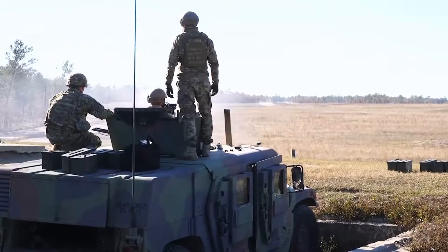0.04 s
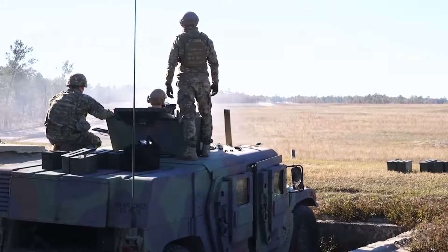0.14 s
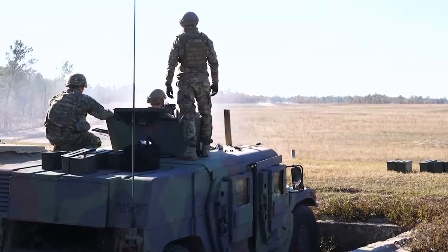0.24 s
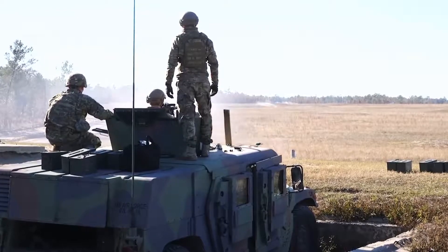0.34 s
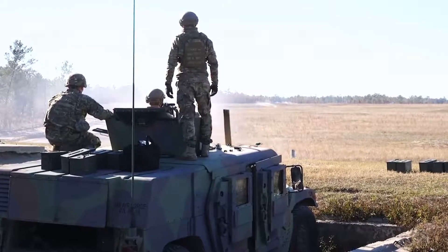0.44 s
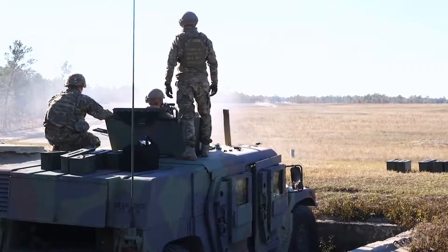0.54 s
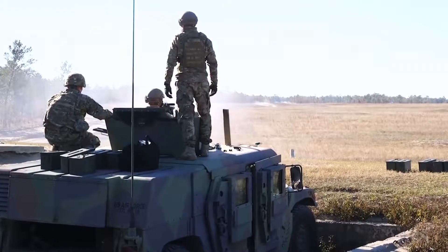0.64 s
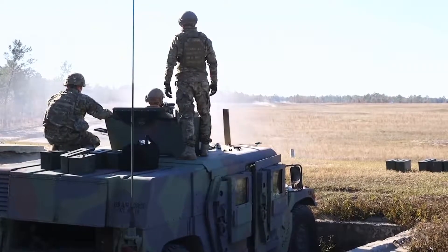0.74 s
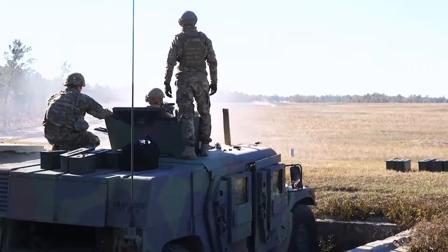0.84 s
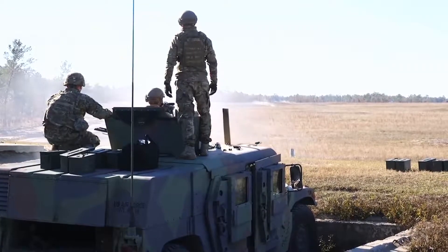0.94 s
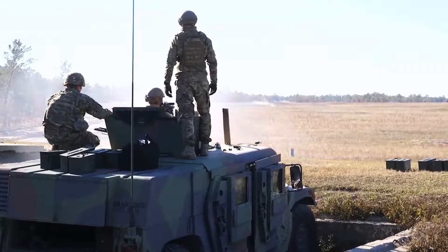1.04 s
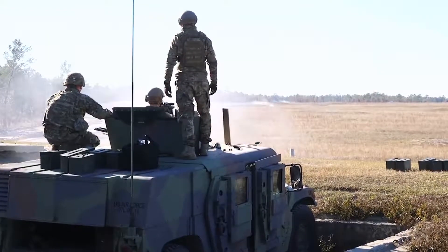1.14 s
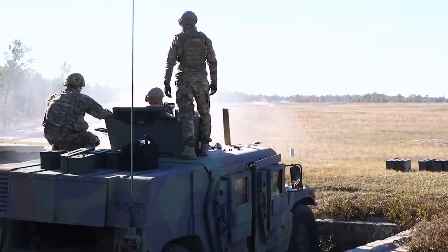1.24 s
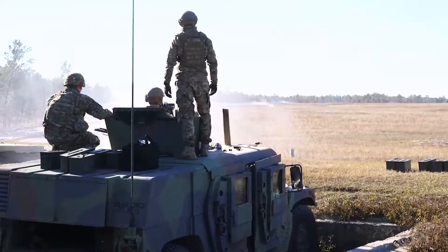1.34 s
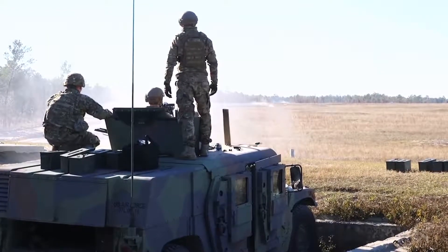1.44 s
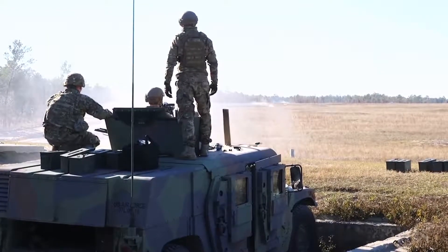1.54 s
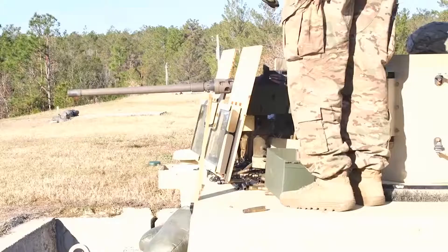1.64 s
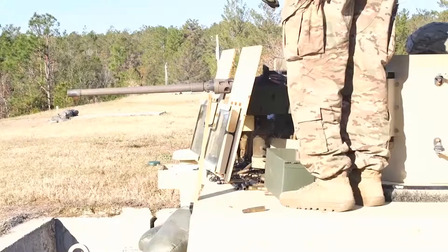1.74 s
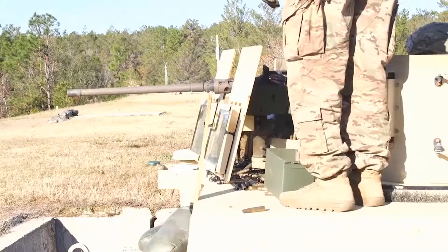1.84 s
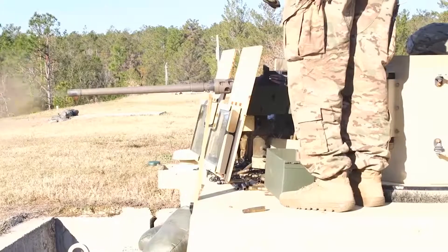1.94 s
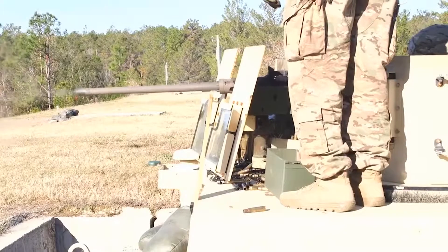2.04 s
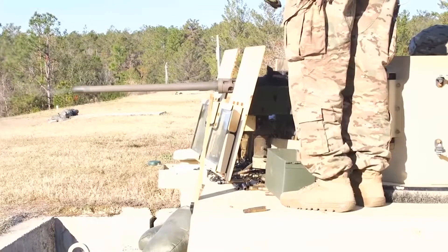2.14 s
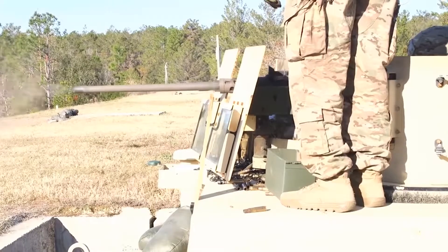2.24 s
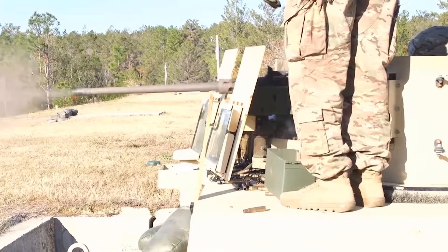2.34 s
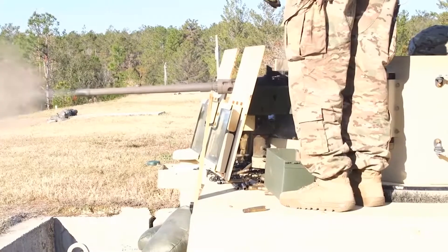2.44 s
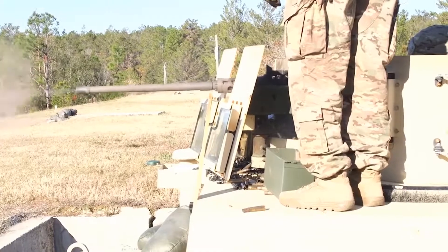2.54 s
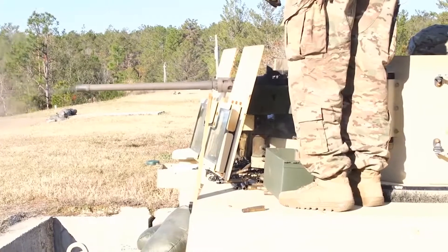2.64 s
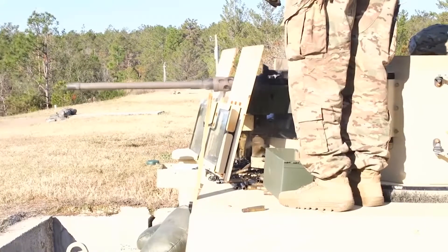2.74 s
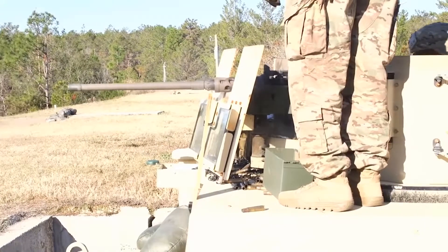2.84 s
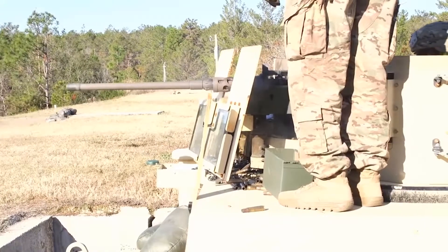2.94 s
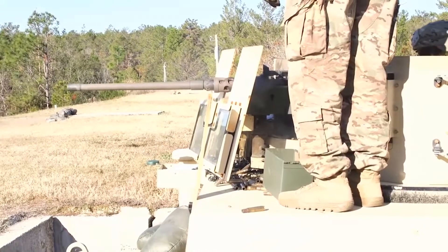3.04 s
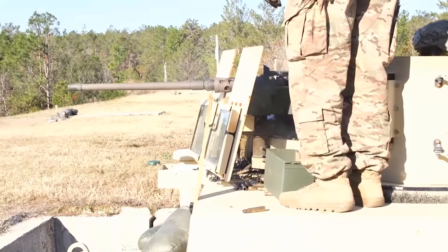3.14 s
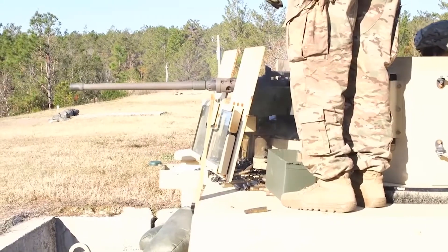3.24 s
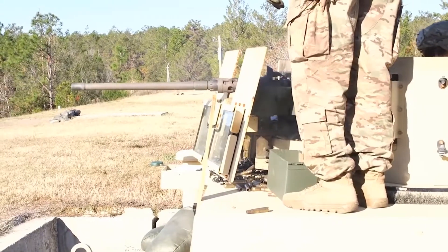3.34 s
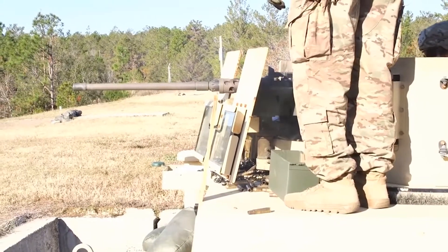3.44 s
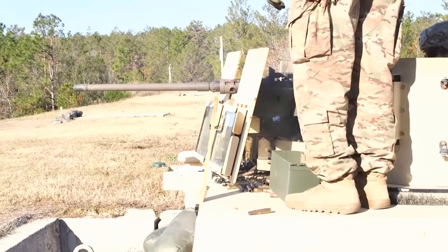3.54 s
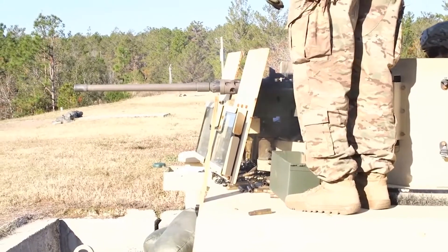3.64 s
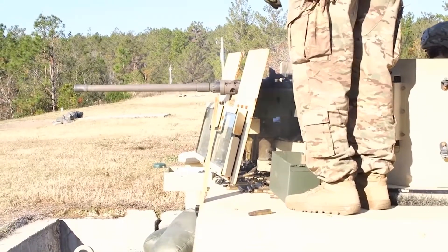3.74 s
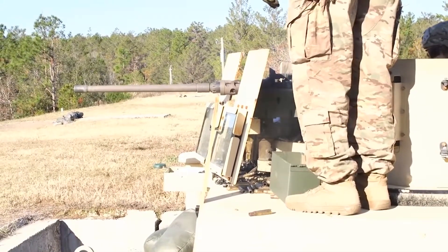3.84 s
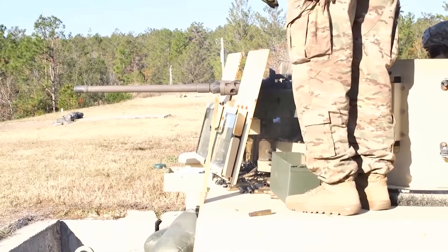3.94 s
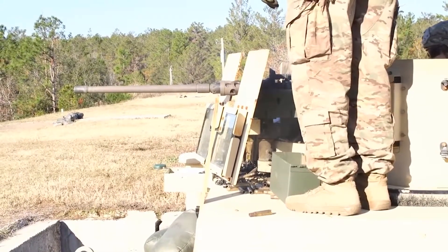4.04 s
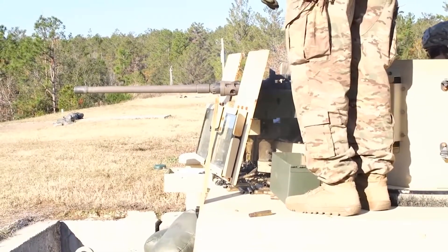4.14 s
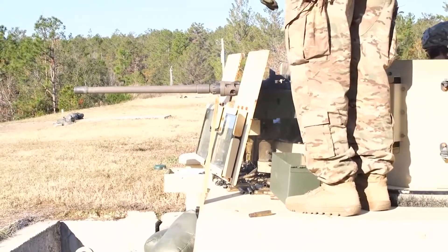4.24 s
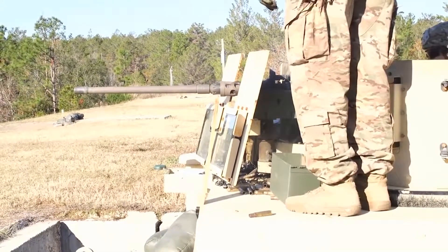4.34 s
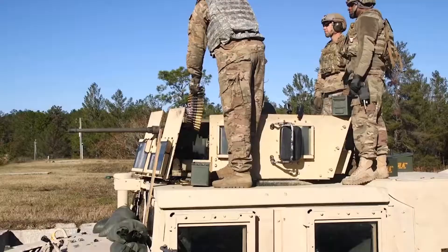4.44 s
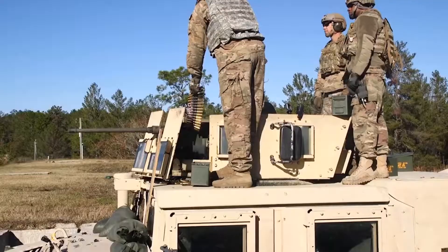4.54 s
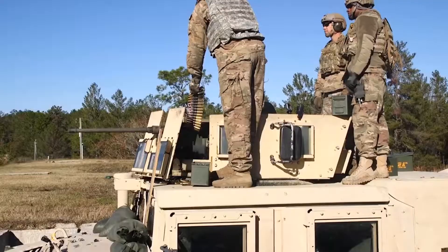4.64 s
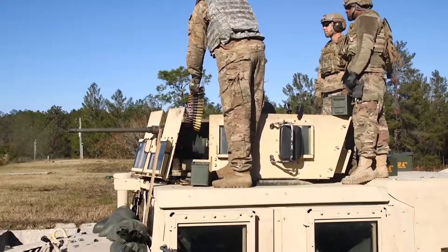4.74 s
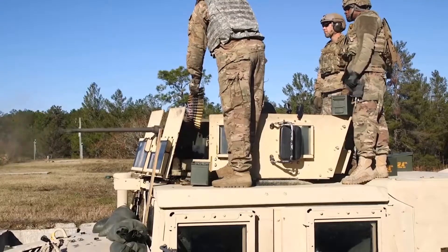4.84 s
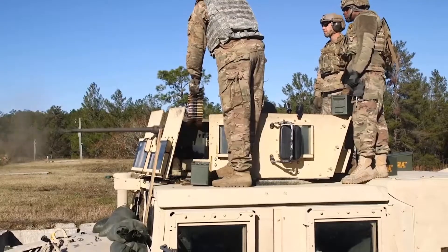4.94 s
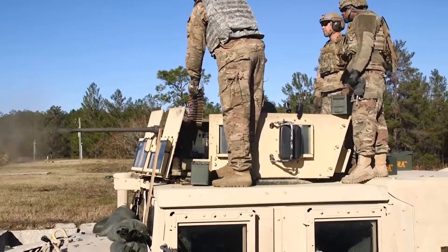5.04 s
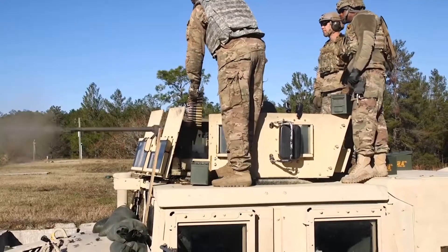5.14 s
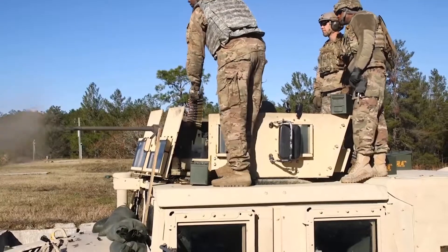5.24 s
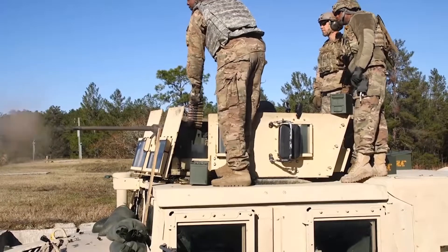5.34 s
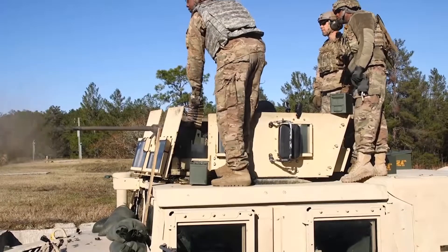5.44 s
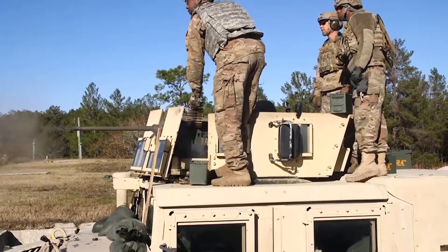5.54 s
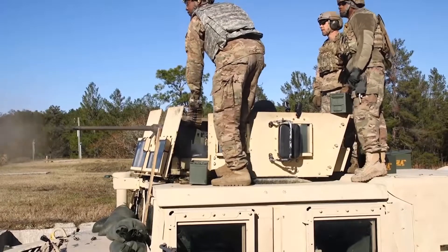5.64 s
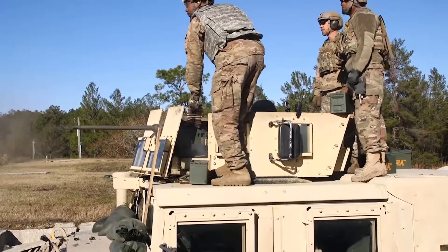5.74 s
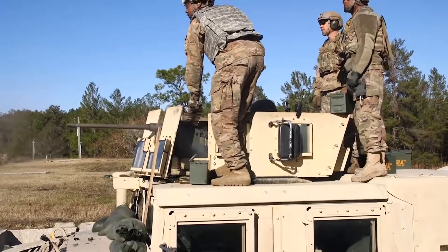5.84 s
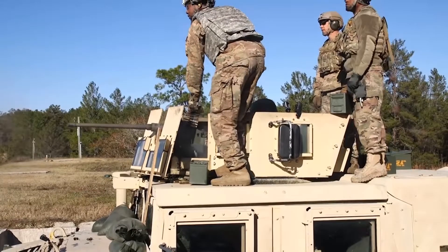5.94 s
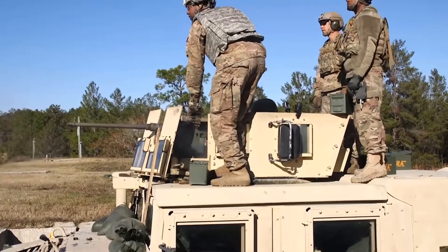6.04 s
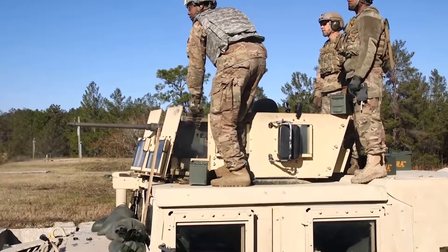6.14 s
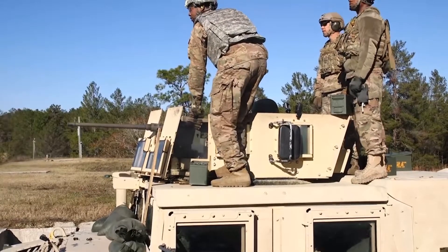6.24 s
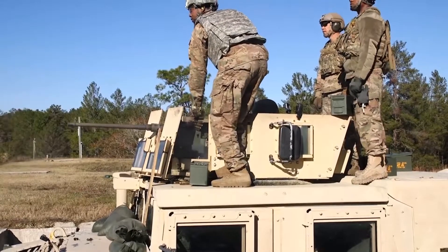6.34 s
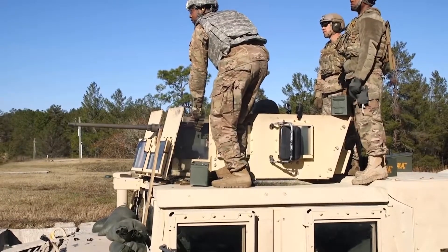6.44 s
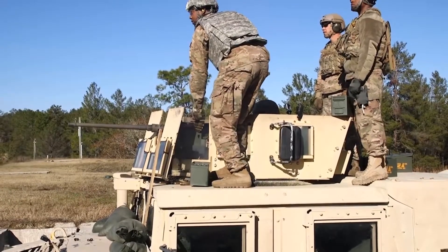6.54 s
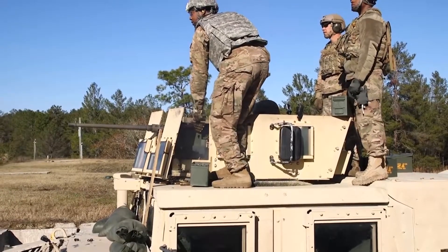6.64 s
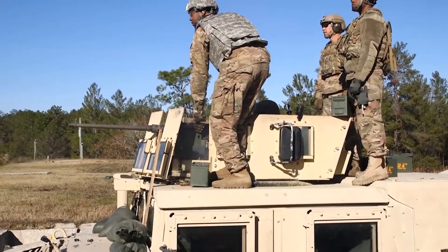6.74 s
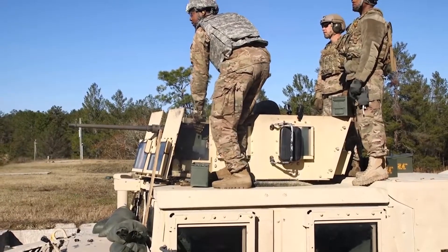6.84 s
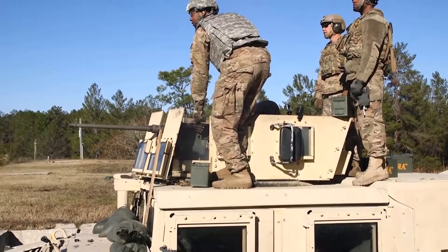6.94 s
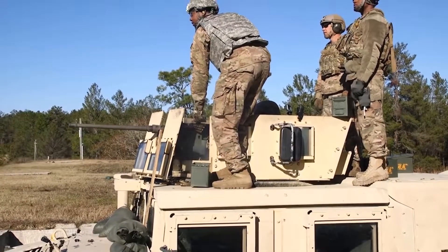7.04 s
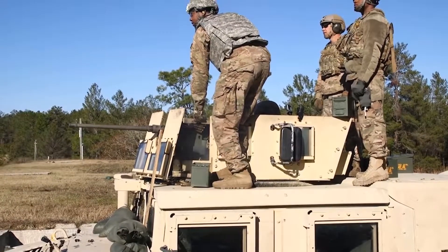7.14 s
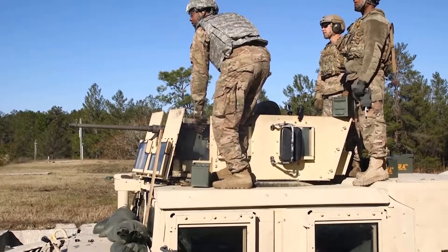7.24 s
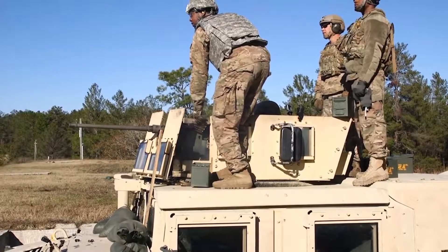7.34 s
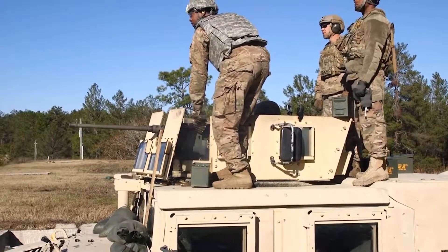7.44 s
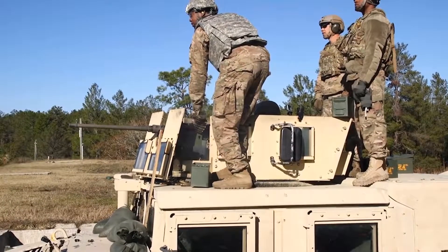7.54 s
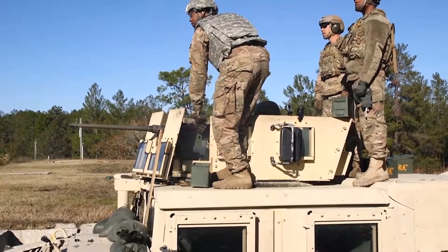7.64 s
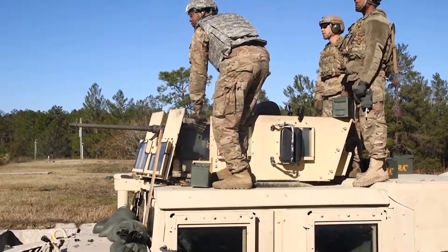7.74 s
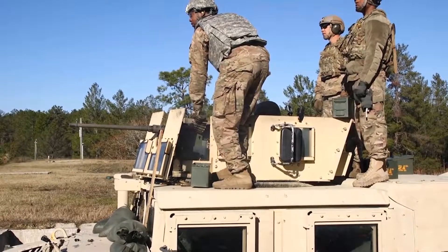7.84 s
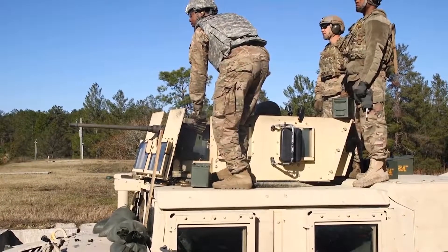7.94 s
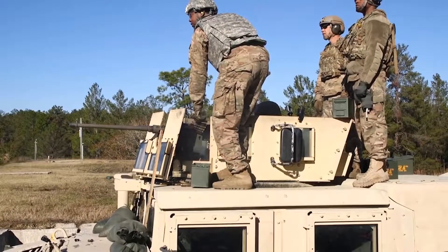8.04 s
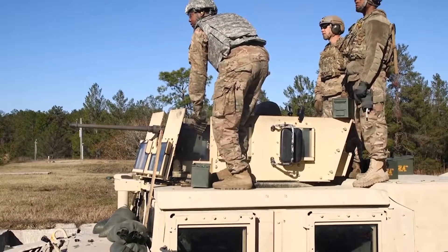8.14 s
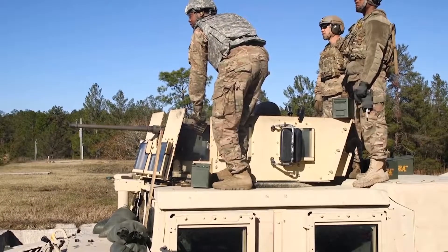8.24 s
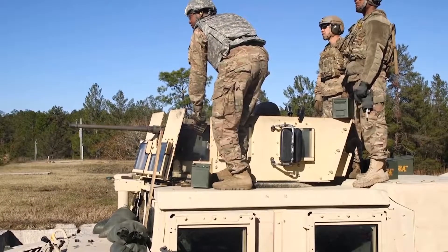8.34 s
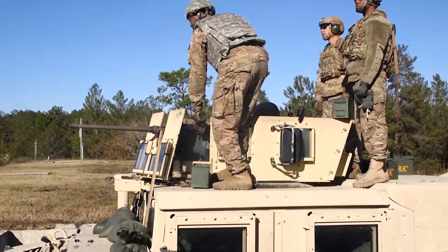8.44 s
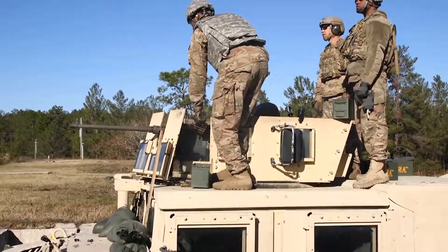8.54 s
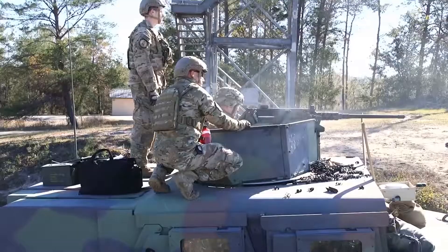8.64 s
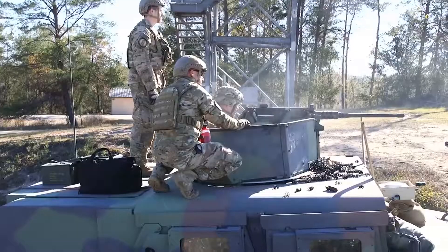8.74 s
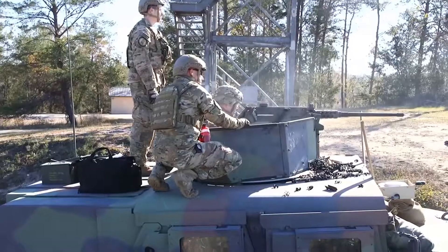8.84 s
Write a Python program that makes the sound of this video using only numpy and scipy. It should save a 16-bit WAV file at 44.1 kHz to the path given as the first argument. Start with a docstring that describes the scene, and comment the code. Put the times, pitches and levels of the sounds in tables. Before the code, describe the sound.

On an open range, a heavy machine gun fires a rapid burst from some distance to the left. Two close, faster bursts follow, booming and overloading the microphone, their echoes rolling away over the field. After each, the steel ammunition belt jingles and spent cases clink on a vehicle roof. A last, duller burst with sharp snaps comes from a neighbouring gun. The microphone changes position for each burst.

```python
"""Heavy machine guns on an open range

Four bursts, with the microphone at a new place around the armoured vehicles for each. Every round
sends nearly the same blast and low boom, which overload the microphone into flat tops, and echoes
roll away over the field. The steel ammunition belt jingles and spent cases clink on the roof."""
import sys
import numpy as np
from scipy import signal
from scipy.fft import rfft, irfft, next_fast_len
from scipy.io import wavfile

SR = 44100
rng = np.random.default_rng(int(sys.argv[2]) if len(sys.argv) > 2 else 0)


def generate_wav(sig):
    """Save sig (samples, or channels by samples) to the path in sys.argv[1] as 16-bit PCM at SR."""
    pcm = np.round(np.clip(np.atleast_2d(sig).T, -1, 1) * 32767).astype(np.int16)
    wavfile.write(sys.argv[1], SR, pcm)


N = 391608
TIME = np.arange(N) / SR


def from_db(db):
    """Decibels to gain."""
    return 10 ** (np.asarray(db) / 20)


def gain_at(points, hz):
    """Gain of a (Hz, dB) table, joined on a log-frequency axis."""
    table = np.array(points)
    return from_db(np.interp(np.log(hz + 1), np.log(table[:, 0]), table[:, 1]))


def pan(left_db):
    """Channel gains: the left leads by left_db, as the right is turned down."""
    return from_db([[0], [-left_db]])


def dying(t60, rise_s=0.00045):
    """A quick swell, then an exponential decay down to -60 dB."""
    t = np.arange(int(t60 * SR)) / SR
    return from_db(-60 * t / t60) * (1 - np.exp(-t / rise_s))


def ragged(samples, spread_db, count):
    """An uneven gain with mean power near 1: energy arrives in random clumps."""
    clumps = from_db(spread_db * np.clip(rng.normal(size=count), -2, 2))
    clumps /= np.sqrt(np.mean(clumps ** 2))
    return np.interp(np.arange(samples), np.linspace(0, samples, count), clumps)


def add(out, s, sound):
    """Mix a sound in at time s."""
    at = round(s * SR)
    first, last = max(at, 0), min(at + sound.shape[-1], N)
    if last > first:
        out[:, first:last] += sound[..., first - at:last - at]


def one_pole(x, hz, kind="low"):
    """A gentle low-pass or high-pass."""
    return signal.sosfilt(signal.butter(1, hz, kind, fs=SR, output="sos"), x)


def noise(colour, likeness, corner_hz=20000, size=65536, air_hz=40000):
    """A loop of coloured stereo noise, dulled by the air; the channels grow unrelated in the treble."""
    hz = np.fft.rfftfreq(size, 1 / SR)
    shape = gain_at(colour, hz) / np.hypot(1, hz / corner_hz) * np.exp(-(hz / air_hz) ** 2)
    alike = np.clip(likeness, -.98, .98) / (1 + (hz / 2600) ** 2)
    left, other = np.exp(2j * np.pi * rng.random((2, len(hz))))
    right = alike * left + np.sqrt(1 - alike ** 2) * other
    x = irfft(shape * np.array([left, right]))
    return x / x.std()


def excerpt(loop, count, start=0):
    """Samples of a loop, from a given share of the way round."""
    return np.take(loop, np.arange(count) + int(start * loop.shape[1]), axis=1, mode="wrap")


def times_of(rounds):
    """The moments at which the rounds go off."""
    return [s for s, _ in rounds]


def arrival(delay, t60, blur, rise_s=0.0022, crack_db=-5, crack_s=0.003):
    """Envelope of one path: a short crack on top of a dying roar; longer paths blur the front."""
    fade = dying(t60, rise_s + blur * abs(delay))
    return fade * (1 + from_db(crack_db) * np.exp(-TIME[:len(fade)] / crack_s))


def blasts(rounds, paths, colour, likeness, repeat, blur=0.0063, steady_hz=2200, uneven_db=2.5):
    """Each blast arrives direct and off the terrain; below the treble a share (repeat) recurs."""
    out = np.zeros((2, N))
    for delay, level_db, t60, bass_hz, treble_hz, left_db in paths:
        air_hz = 5200 / np.sqrt(abs(delay) + t60 / 8)   # the longer the way, the more treble is absorbed
        loop = one_pole(noise(colour, likeness, treble_hz, air_hz=air_hz), bass_hz, "high")
        fade = from_db(level_db) * pan(left_db) * arrival(delay, t60, blur)
        length = fade.shape[1]
        fade *= ragged(length, 4.5 * min(t60, 1), count=2 + int(t60 * 60))   # long echoes come in slaps
        steady = one_pole(loop, steady_hz)
        pattern = np.sqrt(repeat) * excerpt(steady, length)
        loose = loop - (1 - np.sqrt(1 - repeat)) * steady
        for s, crack_db in rounds:
            strength = from_db(crack_db if delay == 0 else uneven_db * rng.normal())
            roar = pattern + excerpt(loose, length, rng.random())
            add(out, s + delay, strength * fade * ragged(length, spread_db=1, count=60) * roar)
    return out


def booms(rounds, tones, polarity, lag_s=0, spread_db=1, detune=.008):
    """Low booms and pitched echo slaps after each blast; the right channel can lag and be inverted."""
    out = np.zeros((2, N))
    for delay, hz, level_db, t60, left_db in tones:
        fade = dying(t60, rise_s=0.0019) * pan(left_db) * [[1], [polarity]]
        t = TIME[:fade.shape[1]] - [[0], [lag_s]]
        for s in times_of(rounds):
            louder, higher = rng.normal(size=2)
            swing = np.sin(2 * np.pi * hz * (1 + detune * higher) * t)
            add(out, s + delay, from_db(level_db + spread_db * louder) * fade * swing)
    return out


# Spectrum of a snap. Each row: multiple of its centre frequency, density in dB.
SNAP_BAND = [(.08, -20), (.5, 1), (1, 3), (2, -10), (6, -30)]

def snaps(rounds, table, uneven_db=1.0):
    """Sharp snaps of the shot and bright clicks of the bolt, uneven from round to round."""
    out = np.zeros((2, N))
    for delay, db, t60, hz, left_db in table:
        loop = noise([(hz * multiple, level) for multiple, level in SNAP_BAND], .3, size=16384)
        fade = dying(t60, rise_s=0.00013) * pan(left_db)
        for s, crack_db in rounds:
            strength = from_db(db + crack_db + uneven_db * rng.normal())
            add(out, s + delay, strength * fade * excerpt(loop, fade.shape[1], rng.random()))
    return out


def dull_knocks(times, knocks, left_db=4.0, rise_s=0.0026):
    """Soft bands of noise after each given time, as when a round comes back from bank and tree line."""
    out = np.zeros((2, N))
    for delay, db, t60, hz in knocks:
        band = [(hz / 5, -20), (hz / 1.3, -1), (hz, 0), (hz * 1.4, -4), (hz * 3, -20), (hz * 16, -54)]
        loop, fade = noise(band, -0.32, size=32768), dying(t60, rise_s)
        for s in times:
            add(out, s + delay, from_db(db) * fade * excerpt(loop, len(fade), rng.random()))
    return out * pan(left_db)


# The distant burst. Each row: start in seconds, crack level in dB.
FAR_ROUNDS = [(-.089, -1.5), (.0214, 0), (.1323, 0), (.242, 0.5), (.3529, -1), (.4614, 0.5), (.5685, 0),
              (.679, 2), (.7902, 1), (.9052, 0.5), (1.023, 0.5), (1.1396, -2), (1.2523, -1.5)]
# Ways to the microphone: direct, reflected, rolling echo. Each row: delay in seconds, level in dB,
# t60 in seconds, bass and treble corners in Hz, left lead in dB.
FAR_PATHS = [(0, 0.5, 0.13, 140, 3310, 29.5), (.022, -8, 0.085, 40, 7040, 21),
             (.058, -2, 0.14, 300, 2600, 27), (.078, 0.5, 0.082, 220, 2246, 27),
             (.14, -25, 0.13, 150, 2215, 20), (.19, -16.5, 0.35, 400, 2500, 23),
             (.254, -17, 0.09, 120, 2440, 26), (.1, -29.5, 1.8, 90, 2200, 23)]
# Spectrum of the report. Each row: frequency in Hz, density in dB.
FAR_COLOUR = [(25, -39), (70, -5), (130, -10.5), (190, -1), (300, -5.5), (480, -3.5), (800, -7),
              (1500, -13), (3000, -15), (6000, -17), (15000, -25.5)]
# Booms and slaps. Each row: delay in seconds, pitch in Hz, level in dB, t60 in seconds, left lead in dB.
FAR_BOOM = [(.009, 118, 1, 0.095, 27), (0, 409, 0, 0.051, 25), (0.018, 221, -3.5, 0.099, 20),
            (.033, 382, -1.5, 0.06, 24), (0.058, 451.5, 2.5, 0.1, 28), (.06, 603, -4, 0.12, 26.5),
            (.074, 331.6, -3, 0.15, 28)]
# Snaps of the shot and clicks of the bolt. Each row: delay in seconds, level in dB, t60 in seconds,
# centre in Hz, left lead in dB.
FAR_SNAPS = [(-.002, -20, .03, 8000, 15.5), (.0015, -6.5, 0.025, 6000, 22), (.021, 2, .008, 1407, 25),
             (0.028, -20.5, 0.033, 8940, 20), (.055, -20, 0.0064, 8000, 20.5),
             (.0605, -6, 0.009, 3950, 26.5), (0.077, -2, 0.0062, 2970, 28)]
# Returns from bank and tree line. Each row: delay in seconds, level in dB, t60 in seconds, centre in Hz.
FAR_ECHOES = [(.141, -16, 0.076, 290.4), (.19, -29.5, .08, 280), (.254, -13.5, .08, 290),
              (0.294, -27.5, .1, 280), (0.323, -24.5, 0.092, 270), (.389, -28.5, .06, 280),
              (0.418, -30.5, .16, 260)]

def far_gun():
    """From far behind, hard left: a gun feeds unevenly, early reflections as strong as its blast."""
    report = blasts(FAR_ROUNDS, FAR_PATHS, FAR_COLOUR, likeness=-0.4, repeat=.9, blur=0.0037)
    boom = booms(FAR_ROUNDS, FAR_BOOM, polarity=-1)
    echoes = dull_knocks(times_of(FAR_ROUNDS), FAR_ECHOES, left_db=23.0)
    return report + boom + snaps(FAR_ROUNDS, FAR_SNAPS) + echoes


# Microphone places. Each row: start in seconds, left and right overload ceilings in dB, rumble in dB.
PLACES = [(0, -13, -22.5, -78.5), (1.738, -18.5, -16.5, -80.5), (4.478, -17.5, -18, -53),
          (4.885, -19, -17.5, -59), (7.47, -21.5, -16, -72.5), (8.668, -18, -19, -78),
          (8.705, -18, -19, -70.5)]

def by_place():
    """Left ceiling, right ceiling and rumble as gains, held from one place to the next."""
    table = np.array(PLACES)
    row = np.searchsorted(table[:, 0], TIME, side="right") - 1
    return from_db(table[row, 1:]).T


# Background of the open range. Each row: frequency in Hz, density in dB.
RUMBLE = [(25, 6), (70, -11.5), (150, -4.5), (350, -6.5), (700, -7.5), (1400, -15.5), (3000, -27.5),
          (6000, -54), (15000, -74.5)]

def rumble():
    """A low noise whose level steps from place to place."""
    return by_place()[2] * pan(8) * excerpt(noise(RUMBLE, -0.59, size=131072), N)


def metal_ring(modes, detune, spread_db, tumble_hz=32, flutter=0.57):
    """One small piece rings: no two share a pitch or a striking spot, and each flutters as it tumbles."""
    t = TIME[:SR // 3]
    out = np.zeros((2, len(t)))
    for hz, db, t60 in modes:
        higher, louder, right, faster, facing = rng.normal(size=5)
        fade = from_db(db + spread_db * louder - 60 * t / t60)
        ring = fade * np.sin(2 * np.pi * hz * (1 + detune * higher) * t)
        turning = 1 + flutter * np.sin(2 * np.pi * (tumble_hz * 2 ** (faster / 2) * t + facing))
        out += np.outer([1, .7 * (right - 1)], ring * turning)
    return out


# Ring of a steel link. Each row: pitch in Hz, level in dB, t60 in seconds.
LINK_MODES = [(4820, -6.5, 0.39), (6320, -3.5, 0.24), (6470, -1.5, 0.22), (8740, -11, 0.18),
              (8840, -7, 0.17), (10500, -19.5, 0.18), (11450, -10, 0.18), (11900, -11, .18),
              (14100, -15.5, 0.16), (14850, -16, .16)]

def links(touches, count=20):
    """Each touch (s, dB) rings one of the belt's many links."""
    out = np.zeros((2, N))
    rings = [metal_ring(LINK_MODES, detune=.012, spread_db=6) for _ in range(count)]
    for s, db in touches:
        add(out, s, from_db(db) * rings[rng.integers(count)])
    return out * pan(12)


# The feed or a hand shakes the belt. Each row: start and length in seconds, level of a touch in dB.
BELT_SHAKES = [(1.297, 0.073, -65.5), (2.194, 0.57, -39.5), (3.513, 0.28, -54.5), (4.08, 0.017, -70),
               (4.3, .05, -64), (4.42, .04, -63), (5.0, 0.84, -45), (6.25, 0.95, -65.5)]

def shake_db(t, rise_db_per_s=598, settle_db_per_s=52):
    """Level of the belt's touches: each shake starts quickly, holds, then settles."""
    return np.max([db - rise_db_per_s * np.maximum(s - t, 0)
                   - settle_db_per_s * np.maximum(t - s - length, 0)
                   for s, length, db in BELT_SHAKES], axis=0)


# Links rubbing together. Each row: frequency in Hz, density in dB.
SCRAPE = [(500, -8.5), (2500, -7), (4300, -7.5), (4900, 3), (5500, -10), (6400, 5), (7600, -12.5),
          (8900, -0.5), (9800, -10.5), (11700, 1), (13000, -12.5), (15000, -7.5)]

def belt(rounds, touches_per_s=67, scrape_db=-5, ring_db=-16.5, bounce_s=0.02, bounce_loss_db=5):
    """Each round throws out a link; others land and bounce, or touch and scrape as the belt swings."""
    thrown = [(s + 0.032, -45) for s in times_of(rounds)]
    landed = [(s + swell_s / 2 + k * bounce_s, db + ring_db - k * bounce_loss_db)
              for s, db, swell_s, *_ in CLINKS for k in range(4)]
    times = np.arange(0, TIME[-1] - 1, 1 / touches_per_s)
    times += rng.random(len(times)) / touches_per_s
    swinging = list(zip(times, shake_db(times)))
    rubbing = ragged(N, spread_db=3, count=800) * excerpt(noise(SCRAPE, -0.074), N)
    scrape = from_db(shake_db(TIME) + scrape_db) * rubbing
    return links(thrown + landed + swinging) + scrape * pan(11.9)


# Spent cases land on the roof. Each row: start in seconds, level in dB.
CASE_DROPS = [(1.439, -48.5), (1.551, -55.5), (1.66, -54), (2.85, -37.5), (2.93, -48), (2.976, -43.5),
              (3.05, -42.5), (3.14, -58), (3.24, -49), (3.339, -69), (5.93, -45), (6.06, -56), (6.26, -53),
              (6.35, -59), (6.41, -54), (6.48, -58), (6.55, -57), (6.605, -57), (6.69, -71), (6.77, -59)]
# Ring of a brass case. Each row: pitch in Hz, level in dB, t60 in seconds.
CASE_MODES = [(5650, -10, .22), (6030, -9.5, 0.22), (6200, -12, 0.24), (7150, -7, 0.22), (8520, -8, 0.34),
              (10500, -9, 0.25), (10850, -12, .2), (11300, -12.5, 0.24), (12200, -17, 0.2),
              (12700, -19, 0.2), (14000, -19, .2), (14800, -13, .2)]
# Its rim grating on the roof. Each row: frequency in Hz, density in dB.
CASE_GRATE = [(500, -23), (3000, 1), (7000, 8), (9500, -11), (11500, -4), (15000, 4)]

def spent_cases(bounces=4, bounce_s=.045, bounce_loss_db=2.5, grate_db=-2):
    """Cases scatter in uneven, dying bounces, ringing and grating at every contact."""
    out, grating = np.zeros((2, N)), noise(CASE_GRATE, 0)
    tick = from_db(grate_db) * dying(t60=.05)
    for s, db in CASE_DROPS:
        ring = metal_ring(CASE_MODES, detune=0.0088, spread_db=4)
        gaps = bounce_s * (.5 + rng.random(bounces))
        for k in range(bounces):
            at, contact = s + gaps[:k].sum(), from_db(db - k * bounce_loss_db)
            add(out, at, contact * ring)
            add(out, at, contact * tick * excerpt(grating, len(tick), rng.random()))
    return out * pan(12.6)


# Knocks and far echoes. Each row: start in seconds, level in dB, t60 in seconds, centre in Hz.
KNOCKS = [(1.576, -39, 0.042, 1300), (1.687, -29.5, 0.083, 1500), (3.525, -51, 0.089, 1000),
          (3.585, -46, 0.14, 600), (3.745, -46, 0.1, 900), (3.826, -43.5, 0.2, 650), (3.92, -40, 0.18, 594),
          (4.087, -44, 0.12, 796), (4.194, -49, .06, 650), (4.282, -42.5, 0.072, 650),
          (4.345, -48, .06, 650), (4.425, -44, 0.061, 650), (6.262, -41.5, .2, 647),
          (6.519, -43, 0.11, 378), (6.704, -50, 0.11, 260), (7.166, -43, 0.091, 600)]

def late_knocks():
    """Dull knocks and far echoes of the last rounds, between bursts."""
    return dull_knocks([0], KNOCKS)


# The close gun from near by. Rows read as for the far gun.
NEAR_ROUNDS = [(2.0797, -0.5), (2.1936, 1), (2.288, -0.5), (2.3798, -1), (2.475, 0), (2.569, 0),
               (2.661, -1), (2.753, 1.5)]
NEAR_PATHS = [(0, -1.5, 0.19, 450, 8000, 9), (.014, -6, .13, 23, 2410, 4.4), (.034, -12, .17, 18, 450, 7.8),
              (0.095, -18.5, 0.069, 18, 900, 7.1), (.06, -31, 1.2, 20, 1200, 10),
              (.2, -48, 5.3, 20, 3600, 7.9)]
NEAR_COLOUR = [(25, -23), (60, -7.5), (150, -1), (330, -0.5), (550, -4), (1000, -6), (2000, -10),
               (4000, -12), (8000, -14), (15000, -22)]
NEAR_BOOM = [(0.018, 64, -6, 0.14, 24), (0.024, 240, -16, 0.24, 8.8), (0.033, 350, -11, 0.12, 11),
             (.02, 245, -15.5, 0.14, 2.7), (.032, 455, -11.5, 0.15, 17), (0.012, 42, -8, 0.088, 25),
             (0.0022, 27, -11, 0.067, 21)]
NEAR_ECHOES = [(.185, -17.5, 0.06, 602), (0.211, -24.5, 0.048, 573), (1.167, -44, .08, 523)]

def near_gun():
    """Close up: the first cycle is slow, the bolt is audible and a long echo rolls away."""
    report = blasts(NEAR_ROUNDS, NEAR_PATHS, NEAR_COLOUR, likeness=-0.63, repeat=0.65)
    boom = booms(NEAR_ROUNDS, NEAR_BOOM, polarity=-1, lag_s=0.00012)
    echoes = dull_knocks(times_of(NEAR_ROUNDS), NEAR_ECHOES)
    return report + boom + echoes + bolt(NEAR_ROUNDS, level_db=-27, lead_s=.022)


# Rattle of the bolt. Each row: frequency in Hz, density in dB.
BOLT = [(300, -19), (1500, -11), (3000, 3.5), (5500, -2.5), (9000, -6), (15000, -9)]

def bolt(rounds, level_db, lead_s):
    """The bolt rattles forward, ever louder, just before each round after the first."""
    out, loop = np.zeros((2, N)), noise(BOLT, 0)
    swell = np.linspace(0, 1, int(lead_s * SR))
    for s in times_of(rounds)[1:]:
        add(out, s - lead_s, from_db(level_db) * swell * excerpt(loop, len(swell), rng.random()))
    return out * pan(6.7)


# Loose metal lands or shifts. Each row: start in seconds, level in dB, swell and t60 in seconds,
# treble corner in Hz.
CLINKS = [(2.85, -23, 0.0016, 0.14, 9040), (2.976, -25.5, .001, 0.12, 9000),
          (3.088, -38, 0.0035, 0.21, 6000), (3.342, -39.5, 0.0072, 0.22, 8000),
          (3.513, -32, 0.012, 0.256, 7000), (3.552, -35.5, .008, 0.32, 6000),
          (3.674, -36.5, 0.0056, 0.26, 5000), (3.731, -36.5, 0.019, 0.32, 5000),
          (3.895, -37.5, 0.0079, 0.19, 5000), (3.922, -42.5, 0.0033, .14, 6000),
          (4.077, -37.5, 0.0073, 0.165, 7000), (4.279, -52, .003, 0.16, 8000),
          (4.419, -38.5, .008, 0.132, 6000), (5.941, -33, .004, 0.34, 8000),
          (6.053, -34.5, 0.0068, 0.194, 8000), (6.605, -46.5, 0.005, 0.13, 7000),
          (6.765, -52, .003, 0.11, 6000), (6.931, -43.5, 0.024, 0.445, 5000),
          (7.127, -49, .004, 0.17, 9100), (7.158, -37.5, 0.015, 0.13, 3500)]
# Spectrum of its rattle. Each row: frequency in Hz, density in dB.
CLATTER = [(60, -15), (200, -4), (600, -2.5), (1200, -4.5), (2500, -6.5), (5000, -12), (8000, -15.5),
           (11000, -34), (15000, -35.5)]

def clinks():
    """Loose metal shifts in a short, swelling rattle of uneven contacts."""
    out, loop = np.zeros((2, N)), noise(CLATTER, -0.24)
    for s, db, swell_s, t60, treble_hz in CLINKS:
        fade = dying(t60, swell_s)
        contacts = ragged(len(fade), spread_db=3.5, count=70)
        rattle = fade * contacts * excerpt(loop, len(fade), rng.random())
        add(out, s, from_db(db) * one_pole(rattle, treble_hz))
    return out * pan(11.4)


# The close gun from its side. Rows read as for the far gun.
SIDE_ROUNDS = [(4.893, 0), (5.0027, 0), (5.1, 0), (5.196, 0), (5.2861, 0), (5.3783, 0), (5.4699, 0),
               (5.5645, 0), (5.6561, 0), (5.75, 0), (5.844, 0)]
SIDE_PATHS = [(0, -1.5, 0.19, 360, 10600, 10.7), (.02, -8, 0.12, 15, 3300, 6.9),
              (.03, -12, 0.16, 18, 400, 8.7), (.084, -23.5, 0.19, 25, 410, 9.5),
              (.06, -37.5, 0.6, 50, 5500, 6), (.2, -45.5, 3.34, 50, 3900, 7)]
SIDE_COLOUR = [(25, -15), (70, -4.5), (150, 1), (330, -2), (550, -2.5), (1000, -6.5), (2000, -11.5),
               (4000, -13), (8000, -15.5), (15000, -24.5)]
SIDE_BOOM = [(0.014, 68.3, -10, 0.2, 22), (0.0279, 147, -12, 0.2, 8.7), (0.022, 250, -18.5, 0.23, 13),
             (0.024, 303, -10, 0.22, 17), (.02, 540, -13.5, 0.14, 18), (.012, 490, -14, 0.18, 24),
             (0.0022, 29, -16, 0.064, 18)]
SIDE_ECHOES = [(.171, -18.5, 0.08, 516), (.197, -21.5, 0.053, 480), (.3, -42.5, .2, 220),
               (.53, -45, .14, 201.6)]

def side_gun():
    """Beside the close gun: a longer burst, with more bass in the blast."""
    report = blasts(SIDE_ROUNDS, SIDE_PATHS, SIDE_COLOUR, likeness=-0.46, repeat=0.55)
    boom = booms(SIDE_ROUNDS, SIDE_BOOM, polarity=-1, lag_s=0.00059)
    echoes = dull_knocks(times_of(SIDE_ROUNDS), SIDE_ECHOES)
    return report + boom + echoes + bolt(SIDE_ROUNDS, level_db=-25.5, lead_s=0.021)


# The next gun in the line. Rows read as for the far gun.
NEXT_ROUNDS = [(7.4806, -0.26), (7.608, 1.2), (7.7268, -0.65), (7.8335, 0.35), (7.9459, -1.3), (8.064, 1.2),
               (8.1803, -1)]
NEXT_PATHS = [(0, -5.5, 0.089, 35, 879, 8.5), (0.023, -15, 0.1, 60, 5480, 11.5),
              (.075, -22.5, 0.14, 496, 1090, 3), (.101, -23.5, 0.21, 90, 1520, 11),
              (0.205, -29, 0.054, 60, 977, 0), (.26, -36, .1, 60, 1300, -1),
              (0.418, -45, 0.066, 40, 590, -11.5), (.1, -39.5, 2.05, 90.5, 2150, 7.5)]
NEXT_COLOUR = [(25, -24), (70, -8.5), (140, -2.5), (270, -1.5), (400, -6.5), (700, -10.5), (1500, -14),
               (3000, -16.5), (6000, -17.5), (15000, -25)]
NEXT_BOOM = [(0.00093, 222, -7.5, 0.13, 13), (.001, 142.5, -17.5, 0.066, 11.4), (.004, 281, -8, 0.16, 33),
             (.002, 38.2, -13, 0.09, 17), (.044, 149, -21, 0.099, 15), (.076, 505, -22.5, 0.086, 5.3),
             (.076, 940, -29, 0.084, 5)]
NEXT_SNAPS = [(0, -19.5, 0.013, 3010, 27), (.028, -19.5, 0.026, 6100, 14), (0.083, -40.5, .025, 3500, 4),
              (.1065, -30, 0.01, 2500, 8)]
NEXT_ECHOES = [(.075, -24.5, 0.1, 537), (0.106, -27.5, 0.079, 499)]

def next_gun():
    """One place down the line: a gun feeds unevenly, its dull blast edged with sharp snaps."""
    report = blasts(NEXT_ROUNDS, NEXT_PATHS, NEXT_COLOUR, likeness=0.076, repeat=0.67)
    boom = booms(NEXT_ROUNDS, NEXT_BOOM, polarity=1)
    echoes = dull_knocks(times_of(NEXT_ROUNDS), NEXT_ECHOES, rise_s=.0012)
    return report + boom + snaps(NEXT_ROUNDS, NEXT_SNAPS) + echoes


def between(start_s, end_s):
    """A gate, open while the microphone stays at one place."""
    return np.clip(np.minimum(TIME - start_s, end_s - TIME) / .004, 0, 1)


def scene():
    """Each gun is heard until the microphone's place changes."""
    at_far, at_near = between(-1, 1.74), between(2.0765, 4.478)
    at_side, at_next = between(4.8905, 7.474), between(7.47, 8.67)
    guns = far_gun() * at_far + near_gun() * at_near + side_gun() * at_side + next_gun() * at_next
    small_sounds = belt(NEAR_ROUNDS + SIDE_ROUNDS) + spent_cases() + late_knocks() + clinks()
    return guns + small_sounds * (at_far + at_near + at_side) + rumble()


# Response of the microphone. Each row: frequency in Hz, gain in dB.
MICROPHONE = [(20, 0.5), (60, 3), (300, 0.5), (1500, -0.5), (4000, -2), (8000, -4.5), (15000, -2)]

def record(dry, smear_hz=1800, droop_hz=24, leak_db=-17, leak_hz=2500, cutoff_hz=15150):
    """The microphone overloads; its filters tilt and fray the flat tops and cut the highest treble."""
    ceiling = by_place()[:2]
    clipped = ceiling * np.tanh(dry / ceiling)
    excess = one_pole(dry - clipped, leak_hz, "high")   # the fastest swings push past the ceiling
    tilted = one_pole(clipped + from_db(leak_db) * excess, droop_hz, "high")
    pole = np.exp(-2 * np.pi * smear_hz / SR)
    smeared = signal.lfilter([-pole, 1], [1, -pole], tilted)   # all-pass: edges overshoot
    size = next_fast_len(N + SR // 10)
    response = gain_at(MICROPHONE, np.fft.rfftfreq(size, 1 / SR))
    coloured = irfft(rfft(smeared, size) * response, size)[:, :N]
    return signal.sosfilt(signal.ellip(10, .2, 80, cutoff_hz, fs=SR, output="sos"), coloured)


dry = scene()
out = record(dry)
generate_wav(out)
```